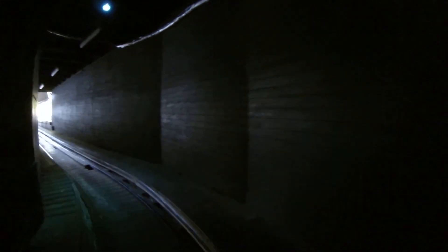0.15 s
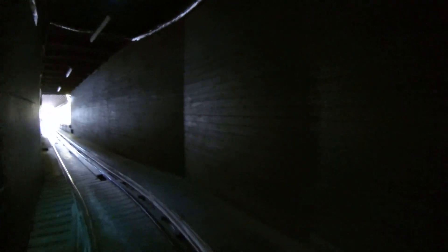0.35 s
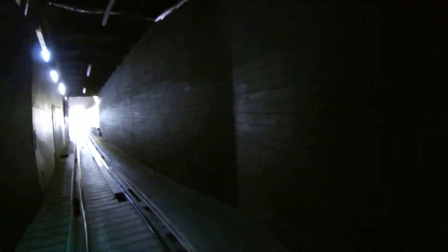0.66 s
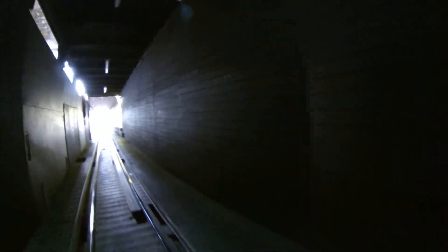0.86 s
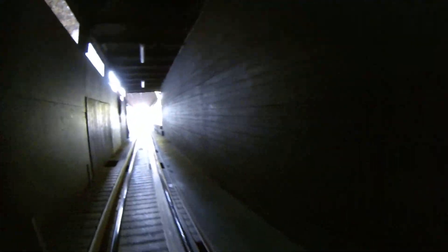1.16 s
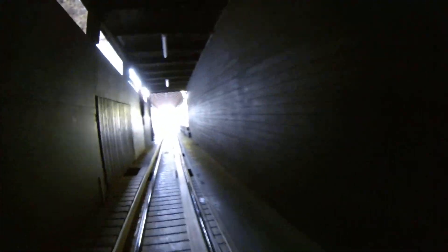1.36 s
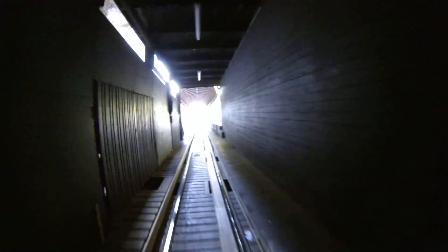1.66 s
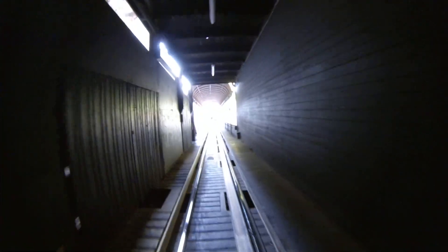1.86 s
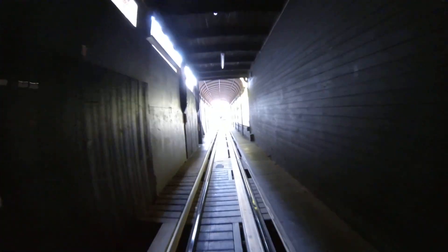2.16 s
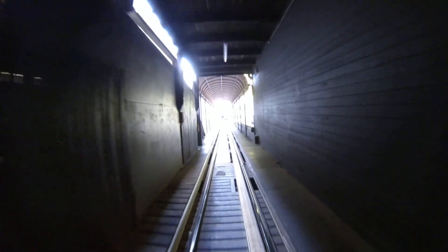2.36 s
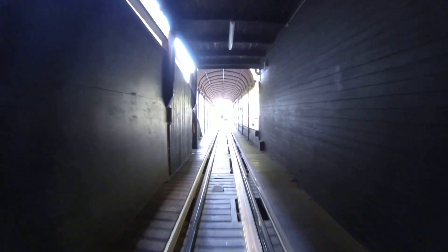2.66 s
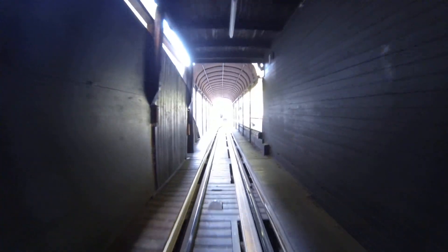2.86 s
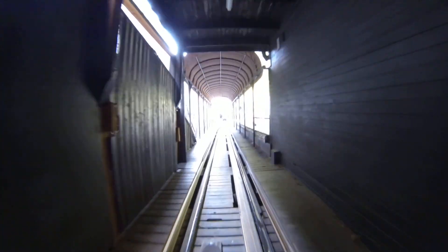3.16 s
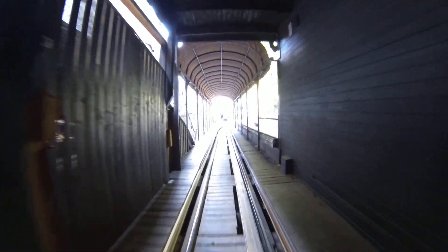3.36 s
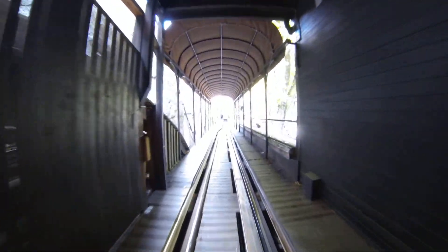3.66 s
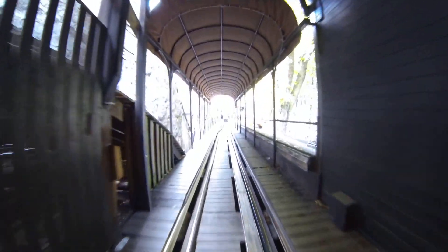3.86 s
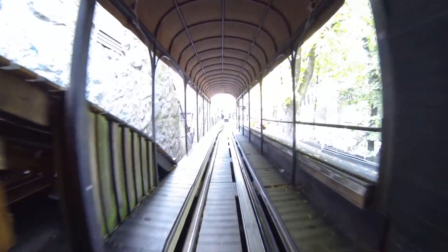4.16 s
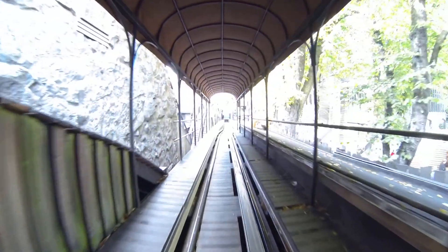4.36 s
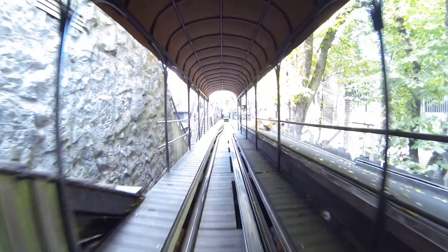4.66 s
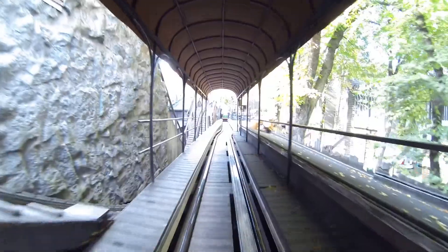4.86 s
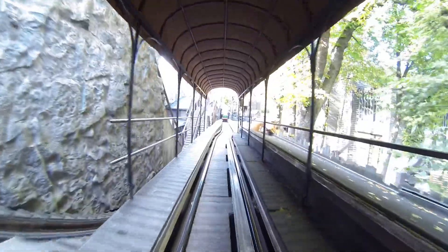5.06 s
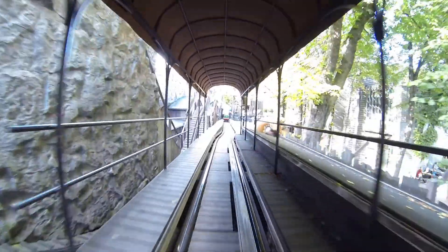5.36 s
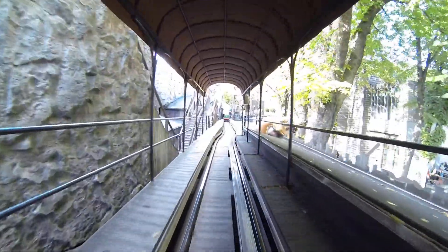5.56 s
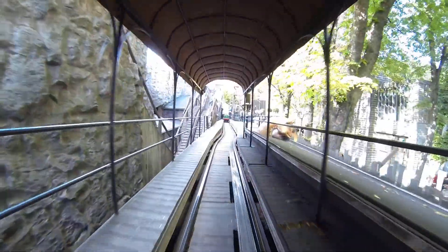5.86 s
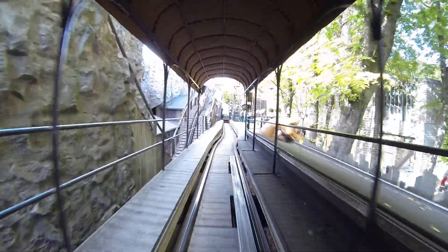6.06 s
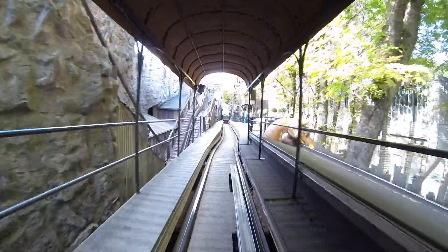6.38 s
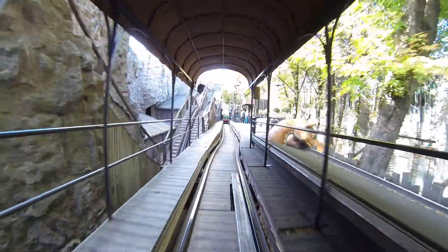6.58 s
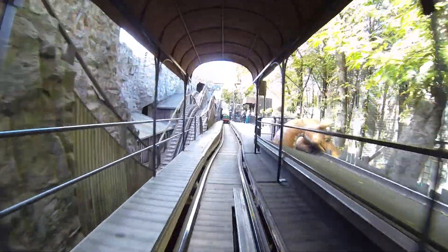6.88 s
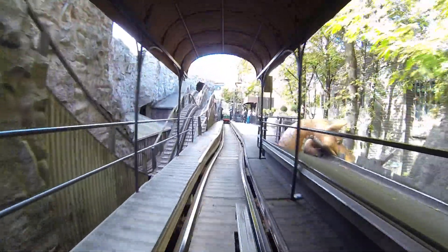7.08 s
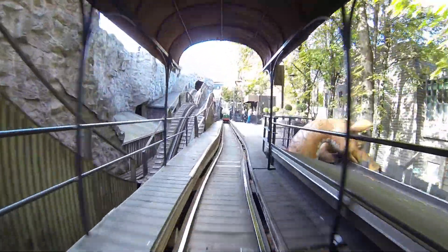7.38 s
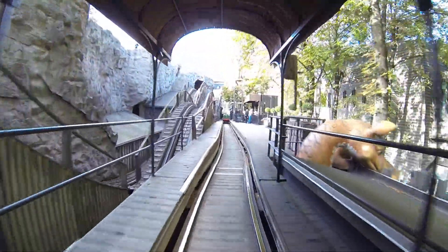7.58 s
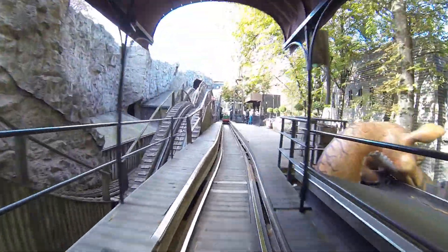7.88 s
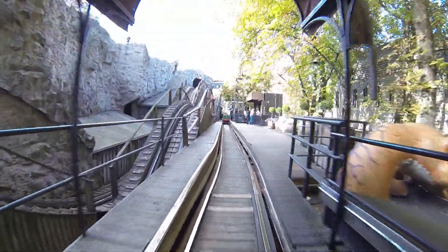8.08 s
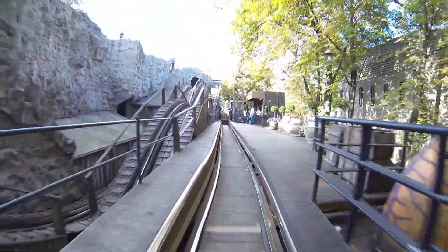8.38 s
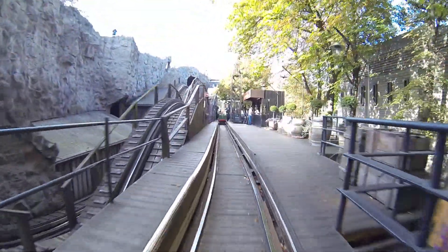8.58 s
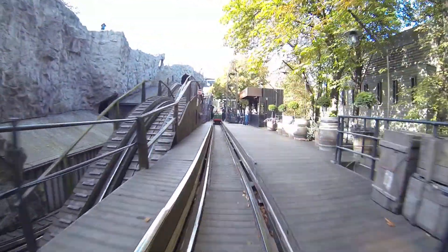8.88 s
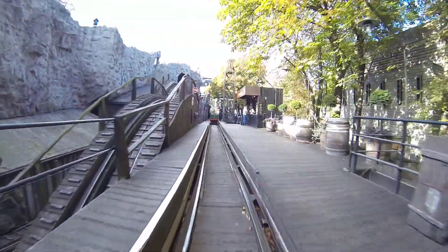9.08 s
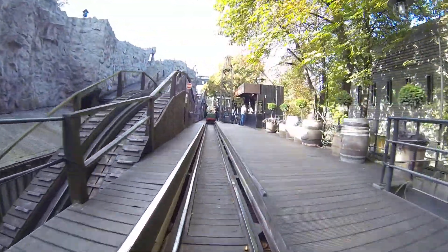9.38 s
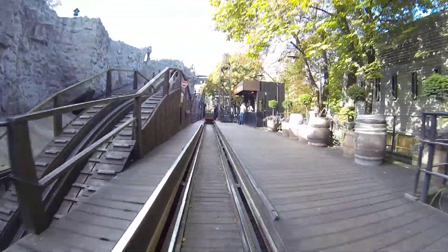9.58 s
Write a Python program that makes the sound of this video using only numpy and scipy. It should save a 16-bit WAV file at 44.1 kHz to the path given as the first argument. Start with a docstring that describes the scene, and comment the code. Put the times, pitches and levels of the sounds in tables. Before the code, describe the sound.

Close onboard, a deep unsteady rumble shudders under clattering wheel knocks, crisp dry ticks, dull thuds and a few sharp metallic catch clacks.

```python
"""A wooden roller coaster car, heard from the front of its train, shakes in two deep modes over a broad rumble.
Wheels excite the modes of chassis and wheels by rough rolling noise, by struck bumps and by flange friction.
Short dry ticks, made of noise bursts, break out at the crests of the deep swing; others come singly or
with dull thuds, over a fine crackle, and a metal catch clacks.
Behind these lie narrow bands of scrape and squeak, and a continuous hiss of air."""
import sys
import numpy as np
from scipy import signal
from scipy.fft import rfft, irfft, next_fast_len
from scipy.io import wavfile

SR = 44100
rng = np.random.default_rng(int(sys.argv[2]) if len(sys.argv) > 2 else 0)


def generate_wav(signal):
    """Clip the signal to [-1, 1] and save it as 16-bit WAV at the path in sys.argv[1]."""
    frames = np.transpose(np.atleast_2d(signal))
    scaled = np.clip(frames, -1, 1) * 32767
    pcm = np.round(scaled).astype(np.int16)
    wavfile.write(sys.argv[1], SR, pcm)


N = 429093
TIME = np.arange(N) / SR


def gain_of(db):
    """Level law: amplitude is ten to the power of decibels over twenty."""
    return 10 ** (np.asarray(db) / 20)


def evened(x):
    """Power normalisation: scales a signal to unit rms."""
    return x / np.sqrt(np.mean(x ** 2) + 1e-20)


def follow(rows):
    """Linear interpolation: every column of a (time, ...) table at every sample."""
    s, *columns = np.transpose(rows)
    return [np.interp(TIME, s, c) for c in columns]


def add(mix, s, sound):
    """Superposition: adds a sound into the mix, in place, from time s."""
    part = mix[max(round(s * SR), 0):][:len(sound)]
    part += sound[:len(part)]


def colour(x, points):
    """Linear filtering: weights the spectrum by (frequency [Hz], level [dB]) points."""
    hz, db = np.transpose(points)
    size = next_fast_len(len(x), True)
    log_hz = np.log(np.fft.rfftfreq(size, 1 / SR) + 1)
    curve = np.interp(log_hz, np.log(hz), db)
    return irfft(rfft(x, size) * gain_of(curve), size)[:len(x)]


def drift(rate, size=4096):
    """Low-passed noise: a smooth random curve of unit rms, changing about rate times a second."""
    hz = np.fft.rfftfreq(size, TIME[-1] / size)
    spectrum = rfft(rng.standard_normal(size)) * np.exp(-(hz / rate) ** 2)
    return np.interp(TIME, np.linspace(0, TIME[-1], size), evened(irfft(spectrum)))


def grit(size, spread_db):
    """Amplitude-scattered noise: grains of very unequal strength."""
    return evened(rng.standard_normal(size) * gain_of(spread_db * rng.standard_normal(size)))


def sliding(hz, width_hz, order=2):
    """Amplitude modulation: low-passed noise on a carrier gives a unit-rms band centred on the curve hz."""
    lowpass = signal.butter(order, width_hz, fs=SR, output="sos")
    band = signal.sosfilt(lowpass, rng.standard_normal(N))
    return evened(band * np.cos(2 * np.pi * np.cumsum(hz) / SR))


def ring(x, modes, size=6000):
    """Modal superposition: convolves a force with the sum of decaying modes."""
    t = np.arange(size) / SR
    response = np.zeros(size)
    for k, (hz, width, db) in enumerate(modes):
        decay = width * np.exp(-np.pi * width * t)
        response += (-1) ** k * gain_of(db) * decay * np.sin(2 * np.pi * hz * t)
    return signal.fftconvolve(x, response / np.linalg.norm(response))[:len(x)]


# a lurch on uneven track: centre [s], 1/e half-width [s], change of the shaking [dB]
LURCH_S, LURCH_WIDTH_S, LURCH_DIP_DB = 4.2, 0.45, -4.5


def lurch_swell():
    """Gaussian envelope: the lurch grows and passes, reaching 1 at its centre."""
    return np.exp(-((TIME - LURCH_S) / LURCH_WIDTH_S) ** 2)


# relative spectrum of air rushing past the car: (frequency [Hz], density [dB per Hz])
AIR_SPECTRUM = [(3500, -1.5), (8000, -9.5), (16000, -19)]


def air(air_db=-81, gust_db=2.0):
    """Broadband flow noise: a faint, gently varying hiss under the ticks."""
    hiss = evened(colour(rng.standard_normal(N), AIR_SPECTRUM))
    return gain_of(air_db + gust_db * drift(4.6)) * hiss


def scraping(scrape_db=-72, band_hz=3700, width_hz=600):
    """Friction noise: a faint fluttering scrape of steel on steel comes and goes with the lurch."""
    flutter = gain_of(scrape_db + 2 * drift(70))
    return flutter * lurch_swell() * sliding(np.full(N, band_hz), width_hz)


def squeak(at_s=1.1, length_s=0.041, squeak_hz=5230, squeak_db=-64):
    """Narrow-band friction: a wheel gives one brief, husky squeak."""
    envelope = np.exp(-(2 * (TIME - at_s) / length_s) ** 2)
    return gain_of(squeak_db) * envelope * sliding(np.full(N, squeak_hz), width_hz=60)


# a wheel flange rubbing on the rail: (time [s], mean centre frequency [Hz], level [dB])
FLANGE_RUB = [(3.8, 1493, -79.5), (4.0, 1552, -53.5), (4.25, 1660, -57), (4.9, 2375, -86),
              (5.5, 2456, -65.5), (6.5, 2256, -84.5)]


def rubbing(wander=0.03):
    """Unsteady friction: the flange whines in a narrow band that slides and wavers with the contact."""
    hz, db = follow(FLANGE_RUB)
    return gain_of(db) * sliding(hz * (1 + wander * drift(16)), width_hz=65)


# a wheel flange singing faintly: (time [s], mean frequency [Hz], level [dB])
FLANGE_SQUEAL = [(5.0, 1330, -88), (5.07, 1357, -50), (5.22, 1430, -55), (5.3, 1450, -67)]


def squeal(waver=0.00874):
    """Frequency modulation: a thin unsteady sine slides upward."""
    hz, db = follow(FLANGE_SQUEAL)
    sounding = (TIME > FLANGE_SQUEAL[0][0]) & (TIME < FLANGE_SQUEAL[-1][0])
    phase = 2 * np.pi * np.cumsum(hz * (1 + waver * drift(63))) / SR
    return sounding * gain_of(db) * np.sqrt(2) * np.sin(phase)


# mean colour of a dry tick: (frequency [Hz], relative density [dB per Hz])
TICK_SPECTRUM = [(150, -22), (700, 0.5), (1500, -1), (2800, -4), (4000, -8), (6000, -14), (9000, -23),
                 (12000, -29), (16000, -37.5)]


def tick(length_s, tint_db=3, size=1024):
    """Transient noise: a brief noise burst under a Gaussian envelope, randomly tinted; peak 1."""
    u = np.arange(size) / SR / length_s - 2
    tinted = [(hz, db + tint_db * rng.standard_normal()) for hz, db in TICK_SPECTRUM]
    sound = colour(grit(size, 1.0) * np.exp(-u ** 2), tinted)
    return sound / abs(sound).max()


def double_tick(length_s, gap_s=0.009, second_db=-9):
    """Paired transients: one tick is followed closely by another, usually softer."""
    second = gain_of(second_db + 2 * rng.standard_normal()) * tick(length_s)
    out = np.concatenate([np.zeros(round(gap_s * SR)), second])
    add(out, 0, tick(length_s))
    return out


def crackle(swing, per_s=70, crackle_db=-45, spread_db=4.5):
    """Random impulse process: fine clicks come in irregular clusters, mostly near the crests of the swing."""
    rate = per_s * evened(swing) ** 2 * gain_of(spread_db * drift(10))
    sizes = gain_of(crackle_db + spread_db * np.minimum(rng.standard_normal(N), 1))
    fired = rng.random(N) < rate / SR
    clicks = colour(sizes * fired * np.sign(swing), TICK_SPECTRUM)
    return np.diff(clicks, prepend=0) + clicks  # the difference brightens the clicks


# the clearest single ticks, often in quick groups: (time [s], relative level [dB])
CLEAR_TICKS = [(0.151, -46), (0.589, -45.5), (0.8555, -45.5), (1.71, -48.5), (2.301, -42.5), (2.385, -42),
               (3.228, -47), (4.259, -44.5), (4.328, -39), (4.4133, -45.5), (4.689, -44.5), (4.725, -45),
               (5.2997, -41), (6.8058, -47), (7.2754, -45.5), (7.337, -46), (7.3831, -43.5), (7.756, -43),
               (8.4064, -44.5), (8.6023, -44)]


def ticks(tick_db=6, length_s=0.0011):
    """Isolated transients: clear dry ticks, each with its close second."""
    out = np.zeros(N)
    for s, db in CLEAR_TICKS:
        add(out, s, gain_of(db + tick_db) * double_tick(length_s))
    return out


def thud(hz=110, width_s=0.0023, size=1764):
    """Windowed pulse: a dull low push, centred on its crest."""
    t = (np.arange(size) - size / 2) / SR
    return np.hanning(size) * np.cos(2 * np.pi * hz * t) / np.cosh(t / width_s)


def crest_ticks(swing, tick_db=-46.0, full_swing=0.29, growth=1.6, scatter_db=3, length_s=0.00098):
    """Threshold triggering: short dry ticks break out at the crests of the deep swing; the widest also thud."""
    out, push = np.zeros(N), thud()
    threshold, limit = 0.16, 1.1  # least crest that ticks; limit of the crest relative to full_swing
    push_db, bout_db = -32.5, 2.5
    bouts = bout_db * np.tanh(drift(11))  # the ticks strengthen in irregular groups
    crests = signal.find_peaks(abs(swing), height=threshold, distance=SR // 200)[0]
    for at, chance in zip(crests, rng.standard_normal(len(crests))):
        reach = min(abs(swing[at]) / full_swing, limit) ** 2
        strength = reach ** growth * gain_of(scatter_db * min(chance, 1) + bouts[at])
        add(out, at / SR, gain_of(tick_db) * strength * tick(length_s * reach ** 2))
        if reach > 1:
            pulse = gain_of(push_db) * strength * np.sign(swing[at]) * push
            add(out, (at - len(push) / 2) / SR, pulse)
    return out


# hard jolts: (time [s], relative click level [dB], relative thud level [dB])
HARD_JOLTS = [(0.553, -25, -24), (1.4364, -24, -25.5), (2.1984, -26, -28.5), (2.7693, -25.5, -25),
              (3.064, -29, -26.5), (3.16, -18.5, -30.5), (3.698, -27, -29), (3.8045, -25.5, -28),
              (4.0791, -20, -17.5), (4.5053, -17.5, -17.5), (4.943, -25, -23), (5.723, -28.5, -29),
              (5.942, -24.5, -23.5), (6.576, -22.5, -24.5), (6.8996, -29.5, -29), (7.5011, -23.5, -26),
              (7.988, -25.5, -23), (9.643, -27, -27)]


def jolts(swing, click_db=-10.0, thud_db=7, weight_db=-6, length_s=0.0017, crest_s=0.0023):
    """Composite transient: a dull, weighty push with the sign of the swing, and a click at its crest."""
    out = np.zeros(N)
    push = thud() + gain_of(weight_db) * thud(hz=68, width_s=0.02)
    for s, high_db, low_db in HARD_JOLTS:
        add(out, s, gain_of(high_db + click_db) * double_tick(length_s))
        crest = s + crest_s
        direction = np.sign(swing[round(crest * SR)])
        add(out, crest - len(push) / 2 / SR, direction * gain_of(low_db + thud_db) * push)
    return out


# hard clacks of the catch: (time [s], peak level [dB], own ring frequency [Hz], relative ring level [dB])
CATCH_CLACKS = [(2.853, -22.5, 7560, -9.5), (3.165, -24, 770, 14), (4.6156, -15, 3400, -1.5),
                (4.662, -30.5, 990, -2)]
# modes of the metal catch: (frequency [Hz], width [Hz], relative level [dB])
CATCH_MODES = [(1330, 345, 8), (1526, 370, 7.5), (2030, 220, 1.5), (2960, 2000, -11.5), (5400, 1300, -21.5),
               (7500, 2300, -33)]


def clacks(contact_s=0.0047, scuff=0.037, own_width_hz=130, size=4000):
    """Damped impact: a metal catch snaps against its stop, an impulse and a short scuff ringing its modes."""
    out, t = np.zeros(N), np.arange(size) / SR
    for s, db, hz, own_db in CATCH_CLACKS:
        force = (t == 0) + scuff * rng.standard_normal(size) * np.exp(-t / contact_s)
        sound = ring(force, CATCH_MODES + [(hz, own_width_hz, own_db)])
        add(out, s, gain_of(db) * sound / abs(sound).max())
    return out


# wheels rolling on smooth rail: (time [s], relative chassis level [dB], relative wheel level [dB])
SMOOTH_RAIL = [(0, -41.5, -51), (.6, -43, -51), (1.15, -43.5, -53), (1.55, -49, -55), (2.3, -46, -52.5),
               (3.3, -46, -53.5), (4.7, -52, -61), (5.15, -47, -55), (6.4, -48.5, -58.5),
               (7.62, -43.5, -56.5), (7.82, -42, -48.5), (8.4, -43.5, -50), (9.1, -43, -51),
               (9.73, -49, -54)]
# rough stretches: (middle [s], 1/e full length [s], chassis rise [dB], wheel rise [dB])
ROUGH_STRETCHES = [(0.888, 0.16, 11, 17), (2.03, 0.36, 7, 4.5), (2.661, 0.14, 8, 8.5),
                   (3.545, 0.081, 12, 14.5), (4.334, 0.4, 9.5, 13), (8.02, 0.14, 5, 4),
                   (9.4, 0.27, 10.5, 19)]


def roll_levels():
    """Roughness excitation: chassis and wheel levels in dB, swelling over each rough stretch of rail."""
    low_db, high_db = follow(SMOOTH_RAIL)
    for s, length_s, chassis_db, wheel_db in ROUGH_STRETCHES:
        swell = np.exp(-(2 * (TIME - s) / length_s) ** 2)
        low_db = low_db + chassis_db * swell
        high_db = high_db + wheel_db * swell
    return low_db, high_db


# broad first shaking of the chassis by a blow: (mean frequency [Hz], width [Hz], relative level [dB])
BLOW_MODES = [(336.8, 8.5, -5), (449, 16.7, 6.5), (539.6, 96, -6), (794, 10, -21)]
# modes of the wheels: (mean frequency [Hz], width [Hz], relative level [dB])
WHEEL_MODES = [(776.7, 7.7, 1), (1065, 71, -6.5), (1171, 60, -5), (1392, 68, -1), (1488, 65.5, 4),
               (1587, 148, -.5), (1996, 98, -5.5), (2180, 90, -5.5), (2554, 180, -19.5), (2990, 170, -17.5),
               (3690, 93, -23), (4600, 110, -26.5)]


def chatter(chassis_db=4.5, scatter_db=2, count=300):
    """Repeated impact: small knocks of the other wheels, somewhat harder where the rail is rough."""
    out, blows = np.zeros(N), np.zeros(N)
    low_db, high_db = np.mean([follow(SMOOTH_RAIL), roll_levels()], axis=0)
    per_s, chassis_s, wheels_s, wheels_db = 22, .007, .006, 9  # mean knock rate, decay times, wheel gain
    at = (np.cumsum(rng.uniform(.4, 1.6, count)) / per_s * SR).astype(int)
    strengths = gain_of(scatter_db * rng.standard_normal(count))
    blows[at[at < N]] = strengths[at < N]
    parts = (BLOW_MODES, low_db + chassis_db, chassis_s), (WHEEL_MODES, high_db + wheels_db, wheels_s)
    for modes, db, fall_s in parts:
        # each blow dies away exponentially
        pressure = signal.lfilter([1], [1, -np.exp(-1 / (fall_s * SR))], blows)
        out += ring(gain_of(db) * pressure * rng.standard_normal(N), modes)
    return out


def knock(modes, fall_s, impact, rise_s=0.00087, size=5000, detune=0.013):
    """Modal impact: one firm blow and a short scrabble ring modes tuned a little differently each time; peak 1."""
    t = np.arange(size) / SR
    force = grit(size, 4) * (1 - np.exp(-t / rise_s)) * np.exp(-t / fall_s)
    firm_at = np.searchsorted(t, 2 * rise_s)
    force[firm_at] += impact * np.linalg.norm(force)
    tuned = [(hz * (1 + detune * rng.standard_normal()), width, db) for hz, width, db in modes]
    sound = ring(force, tuned, size=size)
    return sound / abs(sound).max()


# wheels striking bumps in the rail: (time [s], relative chassis level [dB], relative wheel level [dB])
RAIL_BUMPS = [(0.281, -34, -38.5), (0.659, -28.5, -37.5), (0.742, -30.5, -42.5), (0.821, -40, -37.5),
              (0.857, -24, -34), (0.914, -29, -38), (0.974, -24.5, -39), (1.033, -33, -34),
              (1.271, -23, -40), (1.671, -31.5, -39), (1.858, -31.5, -36), (2.072, -28.5, -49),
              (2.198, -36, -41), (2.306, -24.5, -41.5), (2.333, -25, -37), (2.511, -28.5, -44),
              (2.568, -29.5, -56), (2.6, -24, -48.5), (3.016, -36, -50.5), (3.25, -28, -44.5),
              (3.495, -28.5, -52.5), (3.582, -28.5, -44.5), (3.791, -28, -43.5), (4.326, -28, -35),
              (4.915, -31.5, -47.5), (5.085, -22, -40), (5.2, -26.5, -46.5), (5.721, -30, -48),
              (5.817, -28, -49), (6.651, -41, -39), (6.676, -27, -52), (6.791, -38, -44.5),
              (7.112, -30.5, -70), (7.219, -25, -42.5), (7.486, -28, -50.5), (7.784, -28.5, -42.5),
              (7.803, -37, -44), (7.901, -34, -43.5), (7.976, -16.5, -33), (8.057, -29, -49),
              (8.109, -24, -39), (8.169, -28, -42.5), (8.478, -24, -44), (8.575, -31.5, -44.5),
              (8.741, -31, -39.5), (9.03, -28, -51), (9.121, -31, -38), (9.242, -31, -45),
              (9.338, -24.5, -30), (9.361, -30, -34), (9.405, -29, -31.5), (9.479, -31.5, -37.5)]


def clatter(chassis_db=0, wheels_db=8, chassis_s=0.016, wheels_s=0.011, lead_s=.001):
    """Transmitted impact: each bump in the rail strikes a wheel and, through it, the chassis."""
    out = np.zeros(N)
    for s, low_db, high_db in RAIL_BUMPS:
        chassis = knock(BLOW_MODES, chassis_s, impact=0.91)
        wheel = knock(WHEEL_MODES, wheels_s, impact=0.31, size=2500)
        add(out, s - lead_s, gain_of(low_db + chassis_db) * chassis)
        add(out, s - lead_s, gain_of(high_db + wheels_db) * wheel)
    return out


# modes of the chassis: (frequency [Hz], width [Hz], relative level [dB])
CHASSIS_MODES = [(287.8, 40, -10), (341.5, 7.6, -4), (445.3, 14, -1), (519, 53, -9), (548, 93.6, -11)]


def rolling(chassis_db=1.0, flutter_db=3.0, contact_hz=1500, hiss_db=-29):
    """Forced vibration: rough rail rings chassis and wheels; soft contact favours the middle wheel modes."""
    low_db, high_db = roll_levels()
    wheels_db, lumps_db = -5, 3.5
    surge = gain_of(flutter_db * drift(32))  # shared by chassis and wheels
    lumps = gain_of(lumps_db * drift(13))
    chassis = ring(evened(grit(N, 3.8) * surge * lumps) * gain_of(low_db), CHASSIS_MODES)
    wheels = ring(evened(grit(N, 3.1) * surge) * gain_of(high_db), WHEEL_MODES)
    wheels = signal.lfilter(*signal.iirpeak(contact_hz, 1, fs=SR), wheels)
    hiss = gain_of(low_db.mean()) * evened(colour(rng.standard_normal(N), TICK_SPECTRUM))
    return gain_of(chassis_db) * chassis + gain_of(wheels_db) * wheels + gain_of(hiss_db) * hiss


HEAVE_HZ, HEAVE_DB = 29.3, -20  # mean frequency; rms level at the height of the lurch


def heaving(wander=1.14):
    """Rigid-body mode: the whole car rocks on its frame as it goes through the lurch."""
    phase = 2 * np.pi * HEAVE_HZ * TIME + wander * drift(8.2)
    return gain_of(HEAVE_DB) * lurch_swell() * np.sqrt(2) * np.sin(phase)


# relative strength of both modes [dB]; shudder's usual energy share [0-1]; duration of a trade [s]
SHAKE_DB, CALM_SHARE, TRADE_S = -15.5, 0.11, 0.093
# bouts of stronger shudder: (start [s], end [s], energy share [0-1]), each at the middle of a trade
SHUDDER_BOUTS = [(0.168, 0.564, 0.68), (0.77, 1.252, 0.74), (4.833, 5.157, 0.51), (5.603, 6.912, 0.36),
                 (7.099, 7.411, 0.18), (7.859, 8.087, 0.62), (9.577, 9.904, 0.54)]
# bumps that catch the car against its swing and stall it for an instant: time [s]
SWING_STALLS = [0.81, 2.59, 3.46, 7.94, 9.05, 9.28]
STALL_S, STALL_DB = .035, -11  # 1/e half-width; change of the shaking


def shake_levels():
    """Energy sharing: bounce and shudder levels in dB trade energy, and both sink in the lurch and stalls."""
    share = CALM_SHARE
    for start, end, top in SHUDDER_BOUTS:
        inside = np.clip(np.minimum(TIME - start, end - TIME) / TRADE_S + .5, 0, 1)
        share = share + (top - CALM_SHARE) * inside
    share = np.clip(share, .01, .99)
    stalled = sum(np.exp(-((TIME - s) / STALL_S) ** 2) for s in SWING_STALLS)
    total_db = SHAKE_DB + LURCH_DIP_DB * lurch_swell() + STALL_DB * stalled
    return total_db + 10 * np.log10(1 - share), total_db + 10 * np.log10(share)


BOUNCE_HZ, SHUDDER_HZ = 43.23, 73  # mean frequencies of the two deep modes
# uneven track: (time [s], relative rumble level [dB])
TRACK_SWAY = [(0.0, -31), (3.5, -34.5), (3.95, -26.5), (5.2, -28), (6.1, -33), (7.3, -28.5), (9.73, -33)]
# broad rumble of the car on its timber track: (frequency [Hz], relative density [dB per Hz])
RUMBLE_SPECTRUM = [(12, -18), (24, -3), (33, 2), (55, -11), (85, -9), (110, -16), (160, -28), (250, -40),
                   (900, -73), (12000, -140)]


def shaking(bounce_db=-0.44, shudder_db=-1, bounce_wander=0.45, shudder_wander=0.65):
    """Modal vibration: the track pushes two deep modes of the car about, over a broad rumble."""
    bounce, shudder = shake_levels()
    unsteady_db, rumble_db = 1.3, 2
    low_gain = gain_of(bounce + bounce_db + unsteady_db * drift(11))
    low = low_gain * np.sin(2 * np.pi * BOUNCE_HZ * TIME + bounce_wander * drift(3))
    high_gain = gain_of(shudder + shudder_db + 2 * unsteady_db * drift(9))
    high = high_gain * np.sin(2 * np.pi * SHUDDER_HZ * TIME + shudder_wander * drift(3.6))
    rumble = evened(colour(rng.standard_normal(N), RUMBLE_SPECTRUM))
    return np.sqrt(2) * (low + high) + gain_of(follow(TRACK_SWAY)[0] + rumble_db) * rumble


def scene(floor_hz=7000):
    """Transmission loss: the sources add up, the wheels' treble muffled by the floor of the car."""
    swing = shaking()
    wheels = rolling() + clatter() + chatter() + rubbing() + squeal() + squeak()
    wheels = signal.sosfilt(signal.butter(2, floor_hz, fs=SR, output="sos"), wheels)
    transients = crest_ticks(swing) + crackle(swing) + ticks() + jolts(swing) + clacks()
    return (swing + heaving() + transients + wheels + scraping() + air())[None]


EDGE_HZ = 15800  # upper band limit


def record(dry):
    """Band limitation: soft ends, then a linear-phase low-pass filter."""
    faded = dry * signal.windows.tukey(N, .002)
    lowpass = signal.firwin(511, EDGE_HZ, window=("kaiser", 9), fs=SR)
    return signal.oaconvolve(faded, lowpass[None], "same")


dry = scene()
out = record(dry)
generate_wav(out)
```